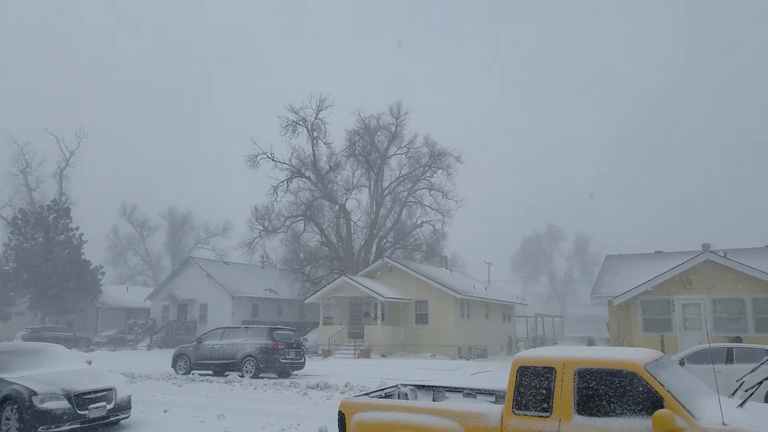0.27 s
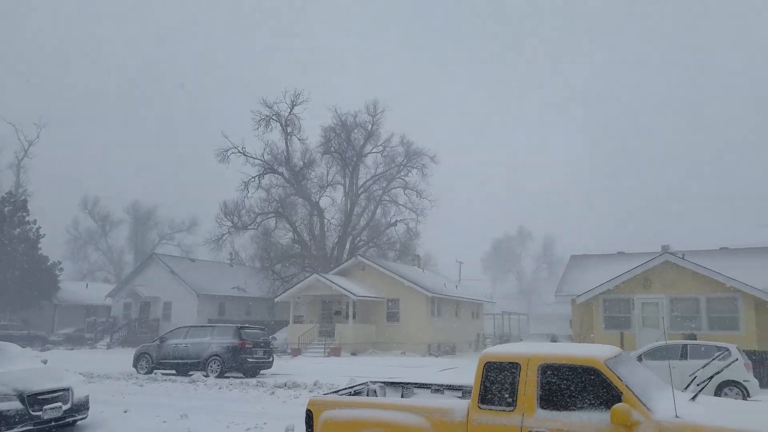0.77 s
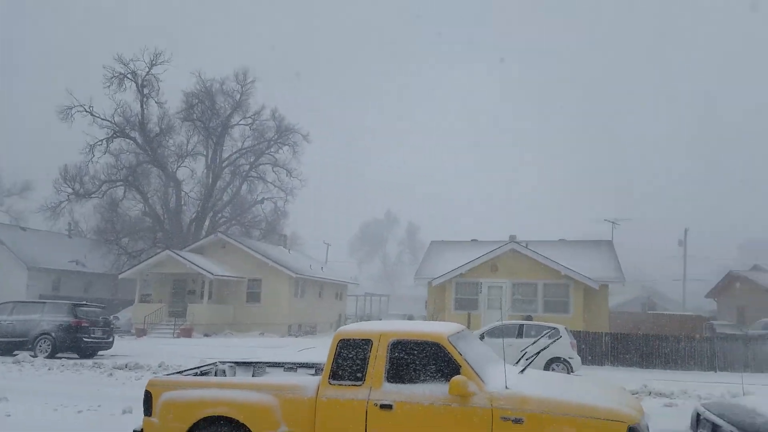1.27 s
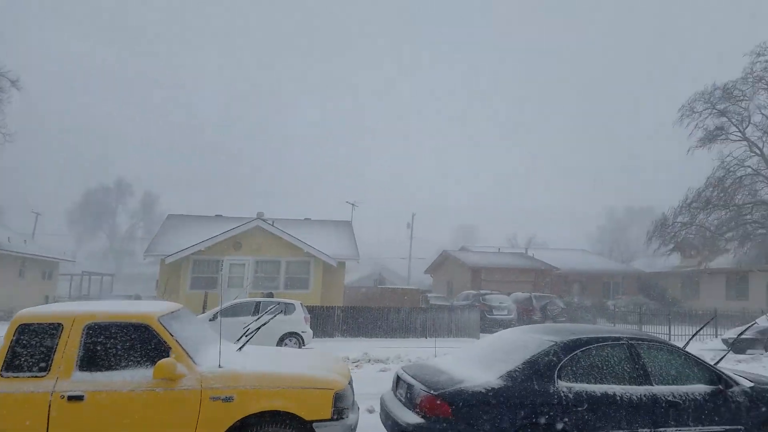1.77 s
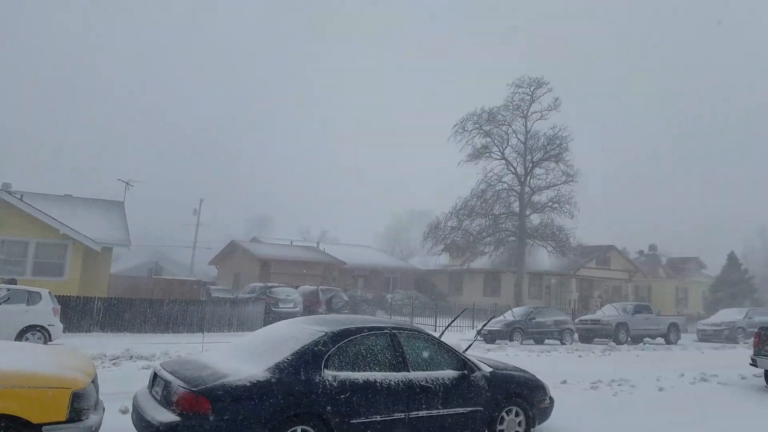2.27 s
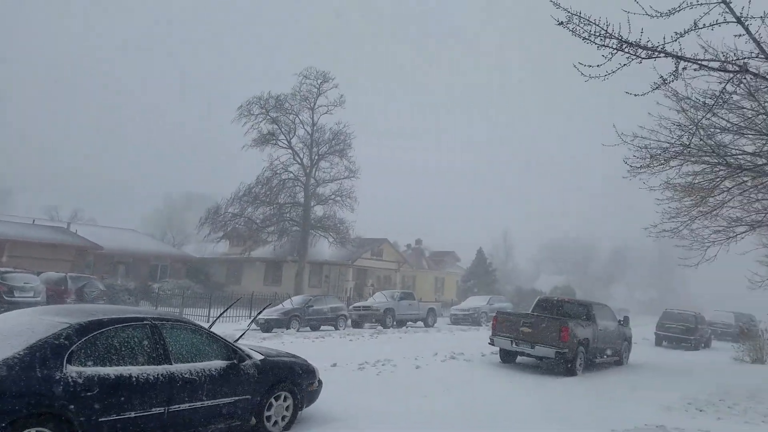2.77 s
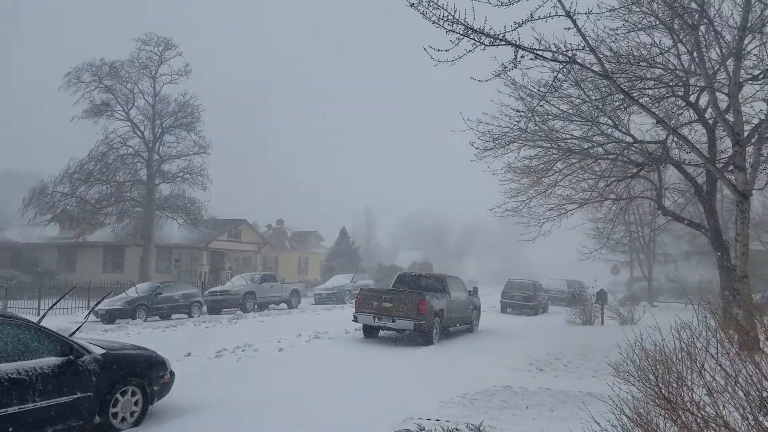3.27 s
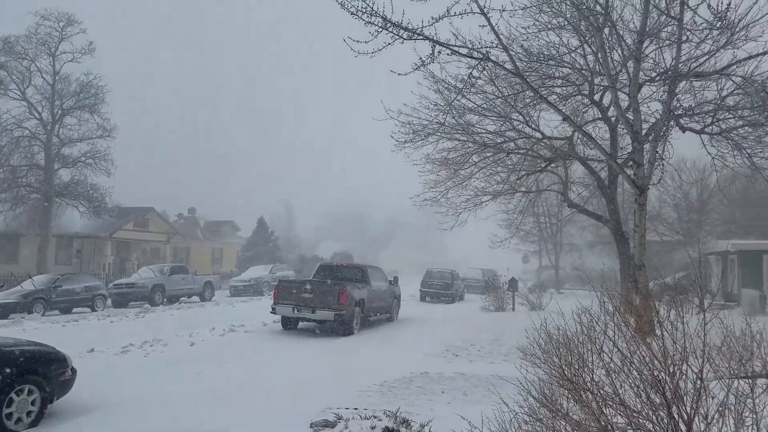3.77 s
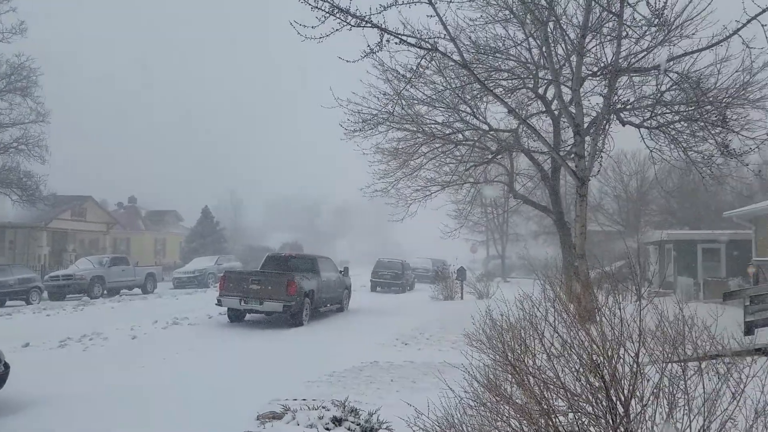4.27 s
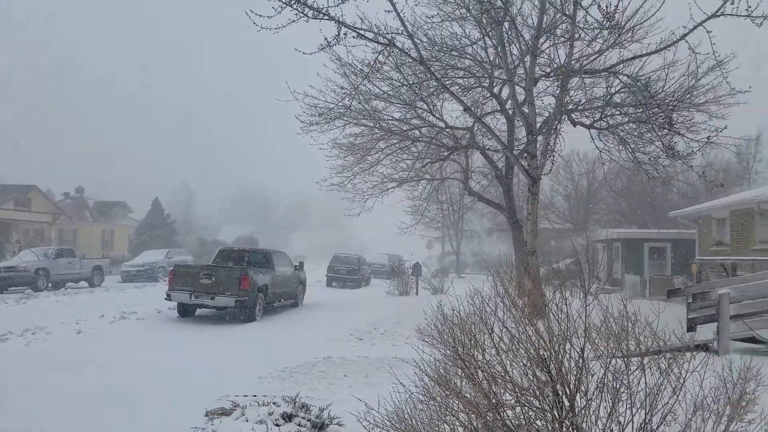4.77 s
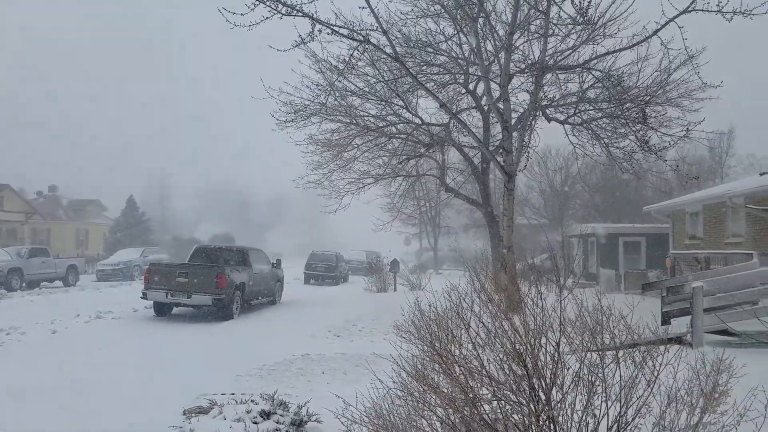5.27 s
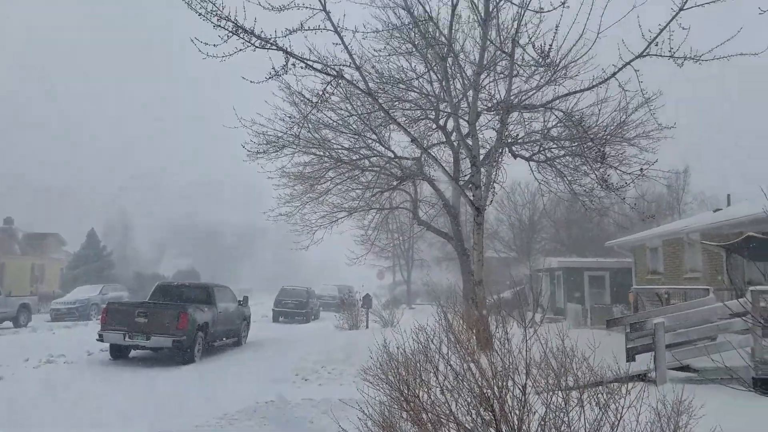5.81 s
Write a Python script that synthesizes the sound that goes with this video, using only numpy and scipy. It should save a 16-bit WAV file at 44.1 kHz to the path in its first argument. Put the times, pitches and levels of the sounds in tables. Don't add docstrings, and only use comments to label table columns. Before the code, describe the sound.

Outdoors in a snowstorm, wind buffets the microphone while a nearby idling vehicle hums faintly, then grows into a loud, deep, constant drone.

```python
import sys
import numpy as np
from scipy import signal
from scipy.fft import rfft, irfft, next_fast_len
from scipy.io import wavfile
from scipy.ndimage import map_coordinates

SR = 44100
rng = np.random.default_rng(int(sys.argv[2]) if len(sys.argv) > 2 else 0)


def wrap_up_sound(samples):
    columns = np.atleast_2d(samples).T
    tamed = np.clip(columns, -1, 1)
    steps = np.round(tamed * 32767).astype(np.int16)
    wavfile.write(sys.argv[1], SR, steps)


def invert_db(level):
    return 10 ** (np.asarray(level, dtype=float) / 20)


N = 266496


def rms_one(x):
    return x / np.sqrt(np.mean(x ** 2) + 1e-20)


def in_time(rows):
    s, *columns = np.transpose(rows)
    return [np.interp(np.arange(N) / SR, s, c) for c in columns]


def at_hz(points, hz):
    point_hz, value = np.array(points)[:, 0], np.array(points)[:, 1]
    return np.interp(np.log(hz), np.log(np.maximum(point_hz, 1)), value)


def drift(rate_hz):
    r = np.exp(-80 * np.pi * rate_hz / SR)
    slow = signal.lfilter([1], [1, -2 * r, r * r], rng.standard_normal(N // 40 + 2002))[2000:]
    return np.interp(np.arange(N) / 40, np.arange(len(slow)), rms_one(slow))


def swell(s, half_s):
    return np.exp(-((np.arange(N) / SR - s) / max(half_s, .01)) ** 2)


def resonance(x, hz, width_hz):
    r = np.exp(-np.pi * width_hz / SR)
    return signal.lfilter([1, 0, -1], [1, -2 * r * np.cos(2 * np.pi * hz / SR), r * r], x)


def sides(pan_db):
    return invert_db(np.multiply.outer([.5, -.5], pan_db))


# (time [s], exhaust cycle rate [Hz], fourth order level [dB])
IDLE_CYCLE = [(0.0, 25.86, -36), (0.15, 26.3, -35.5), (0.52, 26.35, -36), (1.33, 25.3, -37),
              (1.6, 25.52, -36), (1.7, 25.33, -33), (2.1, 25.97, -23), (2.3, 26.36, -23),
              (2.78, 25.68, -23), (3.11, 25.28, -24.5), (4.0, 25.42, -25.5), (4.14, 25.6, -23.5),
              (4.51, 25.64, -24.5), (4.76, 25.66, -23.5), (5.62, 25.67, -23.5), (5.68, 25.26, -24),
              (5.79, 25.35, -27), (6.04, 25.14, -23.5)]
# (order [per cycle], level re fourth in the open [dB], extra while tailpipe hidden [dB])
EXHAUST_ORDERS = [(1, -36, -2), (2, -10.5, 2.5), (3, -8, 1), (4, 1, -1), (5, -87, -10), (6, -15, 0.5),
                  (7, -22, 2.5), (8, -30, -8), (9, -28, 11), (10, -38.5, 14.5), (11, -29.5, 11.5)]
# (order [thirds], level re fourth [dB])
LOPE_ORDERS = [(8, -27), (10, -22), (14, -32), (16, -30)]
PUFF_STRENGTH = [0.99, 1, 1., .9]


def engine():
    cycle_hz, main_db = in_time(IDLE_CYCLE)
    turn_rad = 2 * np.pi * np.cumsum(cycle_hz * (1 + 0.012 * drift(21.5))) / SR
    in_open = np.clip((main_db + 37.5) / 12, 0, 1)
    orders = [(k, db + hidden_db * (1 - in_open)) for k, db, hidden_db in EXHAUST_ORDERS]
    orders += [(k / 3, db) for k, db in LOPE_ORDERS]
    out = 0
    for k, level_db in orders:
        puffs_rad = np.angle(np.sum(PUFF_STRENGTH * np.exp(-.5j * np.pi * k * np.arange(4))))
        pipe_lag_rad = 0.2154 * (k - 4) ** 2 - 1.15
        unsteady_db = 0.28 * k * drift(30.0) + 0.71 * (k != 4) * drift(5.1)
        left_lead_rad = np.multiply.outer([1, 0], 0.16 * min(k - 2, 2) * in_open)
        tone = np.cos(k * turn_rad + puffs_rad - pipe_lag_rad + left_lead_rad)
        pan_db = (1.1 + 1.2 * (k == 2)) * in_open
        out = out + invert_db(level_db + unsteady_db) * tone * sides(pan_db)
    return np.sqrt(2) * invert_db(main_db) * out


# (frequency [Hz], width [Hz], level [dB], share of exhaust swell [ratio])
PANELS = [
    (263.7, 3.8, -47.5, 0.5),
    (297.2, 11.4, -52, 0.045),
]


def body_hum():
    swell_db, out = in_time(IDLE_CYCLE)[1] + 24, 0
    for hz, width_hz, db, share in PANELS:
        steady = 1.17 * np.sin(2 * np.pi * hz * np.arange(N) / SR)
        wavering = 0.84 * rms_one(resonance(rng.standard_normal(N), hz, width_hz))
        out = out + invert_db(db + share * swell_db) * (steady + wavering)
    return out * sides(0.54)[:, None]


# (time [s], left lag behind right [ms])
TURN_LAG = [
    (0, 0.34),
    (1.25, 0.065),
    (1.75, 0.14),
    (2.25, -0.2),
    (2.75, -0.43),
    (3.2, -0.48),
    (6.04, -0.53),
]


def arrive(x, reach=1.):
    lag_samples = reach * in_time(TURN_LAG)[0] * SR / 1000
    left = map_coordinates(x, [np.arange(N) - lag_samples], order=3, mode="mirror")
    return np.array([left, x])


# (frequency [Hz], share common to both ports [ratio])
COMMON_SHARE = [(30, 0.47), (120, 1), (300, 0.62), (600, 0.81), (1300, 0.24), (3000, 0.49), (6000, 0.19),
                (15000, 0.092)]
# (frequency [Hz], left [dB], right [dB])
FACING_AWAY = [(307, -1, -1.5), (900, 1, 1), (1590, 2, -1), (2380, -1, 1), (4600, -1, -3), (5570, 1, 1),
               (6300, -2, -2.5), (8240, -2, -3), (10000, -4.5, -3), (15200, -0.5, 3)]


def air_noise(left, right, low_hz, high_hz, patchy_db, flutter_hz, reach):
    size = next_fast_len(N, real=True)
    hz = np.maximum(np.fft.rfftfreq(size, 1 / SR), 1)
    common = np.clip(at_hz(COMMON_SHARE, hz), 0, 1)
    white = rfft(rng.standard_normal((3, size))) * (hz > low_hz) * (hz < high_hz)
    white = white * np.sqrt([common, 1 - common, 1 - common])
    band = np.floor(3 * np.log2(hz / low_hz))
    together, out = drift(flutter_hz / 4), 0
    for k in range(int(3 * np.log2(high_hz / low_hz)) + 1):
        flicker = invert_db(patchy_db * (.5 * together + drift(flutter_hz)))
        out = out + irfft(white * (band == k), size)[:, :N] * flicker
    both = arrive(out[0], reach) + out[1:]
    after = rfft(both, size) * invert_db([at_hz(left, hz), at_hz(right, hz)])
    before = after * invert_db([at_hz(np.array(FACING_AWAY)[:, [0, side]], hz) for side in (1, 2)])
    turned = np.clip(.15 - 1.8 * in_time(TURN_LAG)[0], 0, 1)
    mix = turned * irfft(after, size)[:, :N] + (1 - turned) * irfft(before, size)[:, :N]
    return np.sqrt(SR / 2) * mix


# (time [s], hiss level [dB])
GUST_LEVEL = [(0.0, -36), (0.01, -52), (0.82, -52), (0.91, -47), (0.96, -51.5), (1.88, -48), (1.97, -47.5),
              (1.98, -46.5), (2.98, -47), (3.25, -45), (3.4, -49.5), (3.46, -45), (3.9, -49), (5.65, -48.5),
              (5.97, -49.5), (6.04, -48.5)]
# (time [s], sizzle level [dB])
FLURRY_LEVEL = [
    (0.1, -62.5),
    (0.63, -66.5),
    (1.27, -65),
    (2.41, -62.5),
    (2.75, -66.5),
    (4.9, -64),
    (5.29, -62),
    (6.04, -62),
]
# (frequency [Hz], density [dB per Hz])
RUMBLE_COLOUR = [(20, -27), (42, -19), (65, -6.5), (120, 2.5), (170, -2), (250, -0.5), (330, -27),
                 (500, -23)]
# (frequency [Hz], density [dB per Hz])
LEFT_COLOUR = [(310, -67.5), (420, -71), (850, -73.5), (1080, -83), (1600, -82.5), (2300, -88),
               (3400, -93.5), (4700, -99), (7000, -102), (8050, -100), (8600, -105), (9300, -105),
               (13000, -100), (15500, -100)]
# (frequency [Hz], density [dB per Hz])
RIGHT_COLOUR = [(310, -71), (420, -70.5), (850, -74.5), (1080, -79.5), (1600, -78), (2150, -76.5),
                (3400, -87), (4700, -90.5), (5600, -100), (6250, -96.5), (7000, -101.5), (8100, -100),
                (9800, -108), (13000, -103), (15500, -107)]


def wind():
    gust_db, flurry_db = in_time(GUST_LEVEL)[0], in_time(FLURRY_LEVEL)[0]
    gust_db = gust_db - np.mean(gust_db)
    flurry_db = flurry_db - np.mean(flurry_db)
    port_gust_db = gust_db * np.array([[.55], [1]])
    rumble_db = -38.5 + 0.74 * (in_time(IDLE_CYCLE)[1] + 23) + 1.4 * drift(1.4)
    rumble = air_noise(RUMBLE_COLOUR, RUMBLE_COLOUR, 27, 520, patchy_db=0.9, flutter_hz=10.97, reach=0.44)
    roar = air_noise(LEFT_COLOUR, RIGHT_COLOUR, 310, 1100, patchy_db=0.43, flutter_hz=6.5, reach=0.7)
    hiss = air_noise(LEFT_COLOUR, RIGHT_COLOUR, 1100, 4400, patchy_db=1.28, flutter_hz=28.0, reach=1.0)
    sizzle = air_noise(LEFT_COLOUR, RIGHT_COLOUR, 4400, 15900, patchy_db=1.02, flutter_hz=32.0, reach=0.97)
    storm = invert_db(0.57 * gust_db) * roar + invert_db(0.52 * port_gust_db) * hiss + invert_db(0.69 * flurry_db) * sizzle
    return invert_db(rumble_db) * rms_one(rumble) + invert_db(-1) * storm


# (time [s], peak [dB], left minus right [10 dB], cavity re peak [dB])
GRAIN_HITS = [(0.0874, -42.5, -11, -15), (0.5891, -53, 3.5, -18), (1.8537, -52, 3.5, -19),
              (2.8567, -55, 1.0, -23), (3.0619, -46, 7.0, -27), (3.4927, -30, 21.5, -15),
              (3.6698, -46, 7.5, -22), (3.901, -48, 5.5, -16), (4.3897, -53, 7, -16),
              (4.4287, -51.5, 5.0, -25.5), (4.4687, -48, 7.0, -20), (4.519, -50, 4.0, -17),
              (4.6488, -37, 11.5, -32), (4.8518, -35, 17.0, -35), (4.9716, -38, 11.5, -27),
              (5.0513, -46, 6.0, -20), (5.246, -45, 6.0, -25), (5.2765, -48, 4.0, -17),
              (5.2979, -46, 5.0, -18), (5.3398, -44, -1.5, -20), (5.4179, -46, 0, -16),
              (5.676, -47, 6.5, -21), (5.7488, -51, 5.5, -18), (5.7959, -51, 4.0, -16),
              (5.818, -43, 7.0, -17), (5.8706, -37, 12.5, -23), (5.9323, -45, 6.0, -28),
              (5.9793, -44, -0.5, -27)]


def snow_grains():
    s, peak_db, pan_db, cavity_db = np.transpose(GRAIN_HITS)
    at = ((s + .0012) * SR).astype(int)
    near = invert_db(peak_db + np.minimum(np.multiply.outer([1, -1], 10.0 * pan_db), 0))
    flurry_db = in_time(FLURRY_LEVEL)[0] - np.mean(FLURRY_LEVEL, axis=0)[1]
    fine_per_s = 60. * invert_db(3.2 * flurry_db)
    fine_hits = rng.random((2, N)) < fine_per_s / SR
    fine_db = -58 + 3.1 * np.minimum(rng.exponential(1, (2, N)), 4)
    hits = fine_hits * invert_db(fine_db) * invert_db([[0], [-8]])
    rings, push = np.full((2, 2, N), 1e-18)
    hits[:, at] += near * invert_db(5.0)
    rings[:, at] += near * invert_db(cavity_db - 11.5)
    push[:, at] -= near * invert_db(30.5) * (peak_db > -31.5)
    fall = invert_db(-60 / (0.0051 * SR))
    crunch = signal.lfilter([1], [1, -fall], hits + 1e-18)
    crunch = crunch * rng.choice([-1, 1], (2, N)) * rng.uniform(0.29, 2.07, (2, N))
    crunch = signal.sosfilt(signal.butter(6, 9200, "high", fs=SR, output="sos"), crunch)
    cavity = 1.4 * resonance(resonance(rings, 9050, 710), 8000, 700)
    cavity += 0.63 * resonance(resonance(rings, 6350, 700), 6320, 700)
    membrane = signal.sosfilt(signal.butter(4, 2600, fs=SR, output="sos"), push)
    return crunch + cavity + membrane


# (time [s], level [dB])
PRESSURE_LUMPS = [(0.0, -61), (.35, -51), (.62, -59), (1.87, -61), (2.61, -62), (2.79, -56), (3.09, -54),
                  (3.45, -59), (4.08, -52), (4.58, -41), (5.01, -44), (5.2, -51), (5.62, -48), (6.04, -54)]


def port_thumps():
    bass = signal.butter(2, [9, 43], "band", fs=SR, output="sos")
    lumps = signal.sosfilt(bass, rng.standard_normal((2, N)))
    lull = invert_db(-82 + 1 * np.arange(N) / SR)
    level = lull + sum(invert_db(db) * swell(s, half_s=0.035) for s, db in PRESSURE_LUMPS)
    return level * rms_one(lumps) * sides(4.1)[:, None]


# (frequency [Hz], width [Hz], left minus right [dB], resting level [dB])
WHISTLE_TONES = [
    (1460, 65, -5, -59),
    (1740, 160, -17, -60),
    (1995, 284, -12, -58),
    (2320, 670, -9.5, -67),
]
# (time [s], rise [dB], half length [s])
WHISTLE_FLARES = [
    [(1.6, 5.5, 0.43), (2.8, 9, 0.32), (3.6, 5.5, 0.27)],
    [(.6, -11, 0.99), (2.3, 6.5, 0.49), (3.7, 2, 0.11), (4.15, 2.5, 0.12), (5.5, 0, 0.22)],
    [(1.4, 0, 0.22), (2.3, 1, 0.14), (4.56, 1.5, 0.97)],
    [(0.986, 14.5, 0.12), (1.44, 12.5, 0.14), (2.18, 11, .15), (2.44, 12, .2), (3.193, 13.5, .17),
     (4.8, 6.5, .2)],
]


def whistles():
    out = 0
    for (hz, width_hz, pan_db, rest_db), flares in zip(WHISTLE_TONES, WHISTLE_FLARES):
        db = rest_db + sum(rise_db * swell(s, half_s) for s, rise_db, half_s in flares)
        tone = rms_one(resonance(resonance(rng.standard_normal(N), hz, width_hz), hz, width_hz))
        out = out + arrive(tone * invert_db(db), reach=0.83) * sides(pan_db)[:, None]
    return out


def far_whine():
    from_s, to_s, fade_db_per_s = .6, 2.42, 40
    t = np.arange(N) / SR
    outside_s = np.maximum(np.maximum(from_s - t, 4.0 * (t - to_s)), 0)
    db = -69 - fade_db_per_s * outside_s
    whine_hz = 2630 + 85 * t + 14.0 * drift(25.0)
    tone = np.sin(2 * np.pi * np.cumsum(whine_hz) / SR)
    return invert_db(db + 2.5 * drift(7.0)) * tone * invert_db([[0], [-5]])


def scene():
    return engine() + body_hum() + wind() + snow_grains() + port_thumps() + whistles() + far_whine()


def roll_off(x):
    return signal.sosfilt(signal.butter(12, 16750, fs=SR, output="sos"), x)


def record(dry):
    cut = signal.sosfilt(signal.butter(1, 12, "high", fs=SR, output="sos"), dry)
    cut = signal.sosfilt(signal.ellip(8, .3, 38, 15750, fs=SR, output="sos"), cut)
    return roll_off(cut)


dry = scene()
out = record(dry)
wrap_up_sound(out)
```